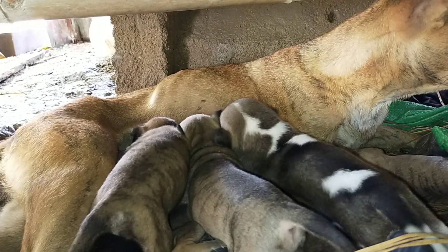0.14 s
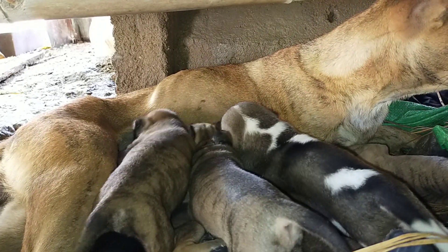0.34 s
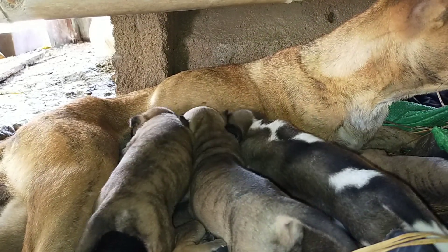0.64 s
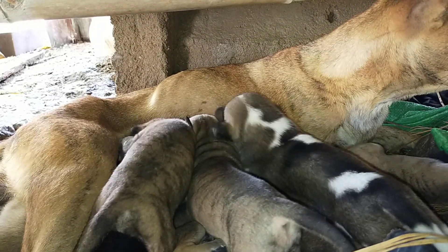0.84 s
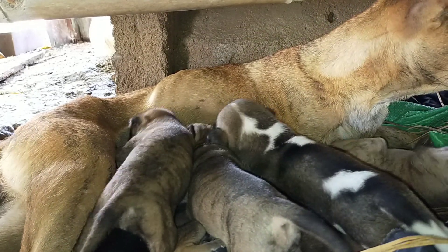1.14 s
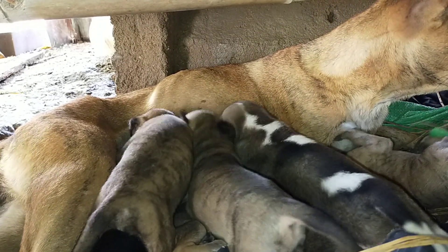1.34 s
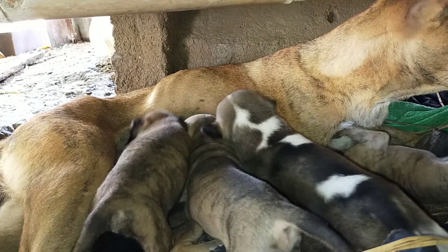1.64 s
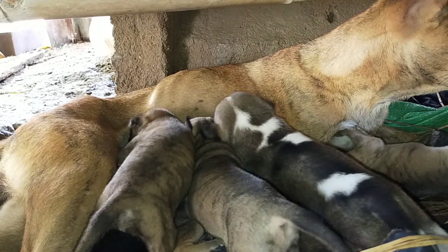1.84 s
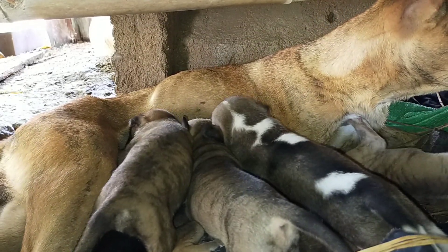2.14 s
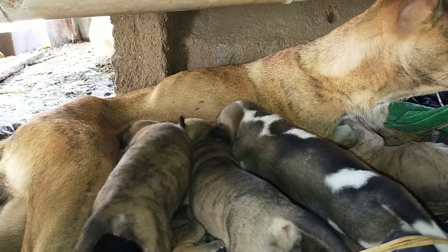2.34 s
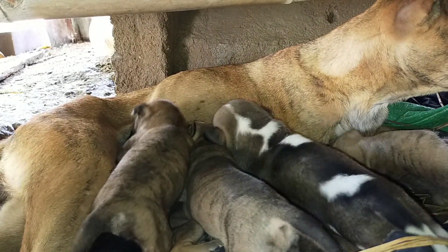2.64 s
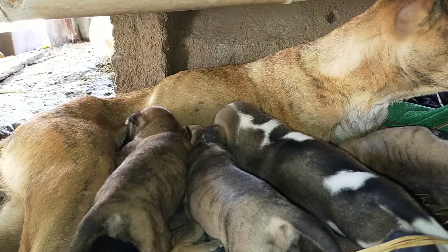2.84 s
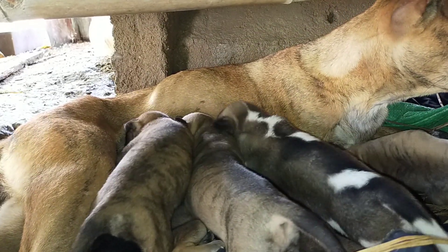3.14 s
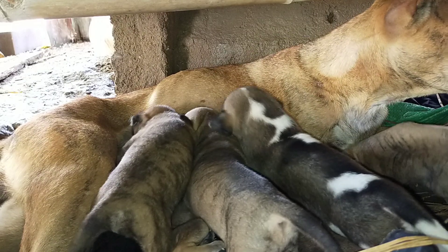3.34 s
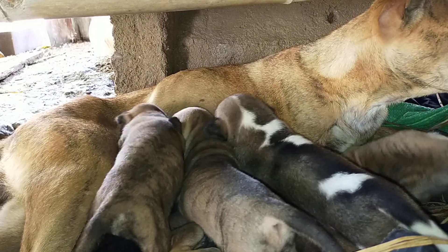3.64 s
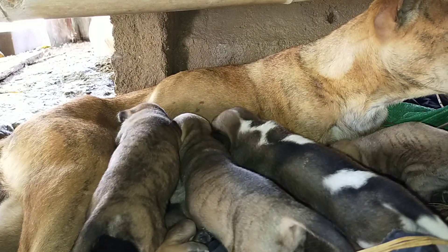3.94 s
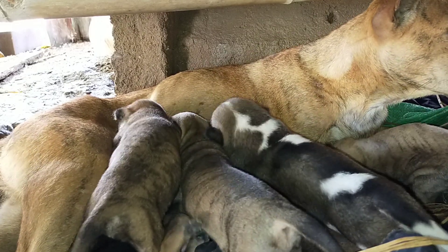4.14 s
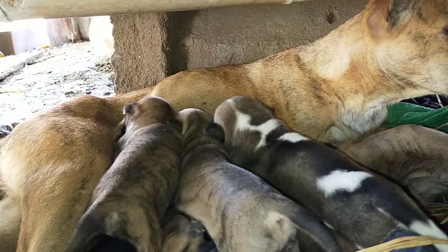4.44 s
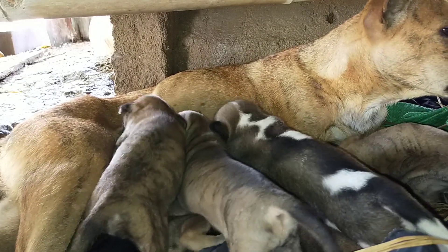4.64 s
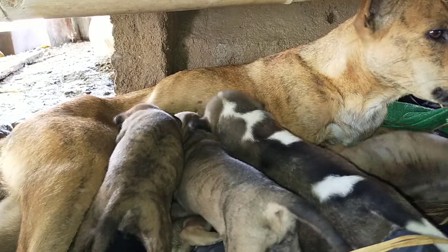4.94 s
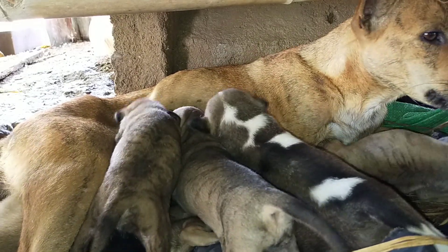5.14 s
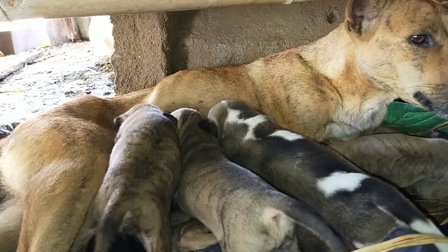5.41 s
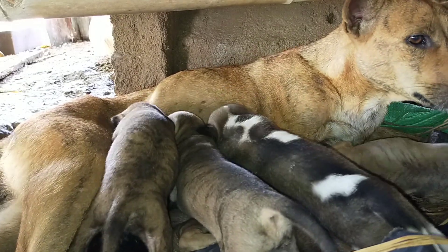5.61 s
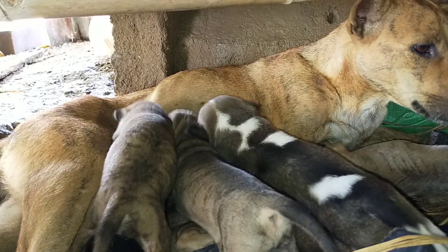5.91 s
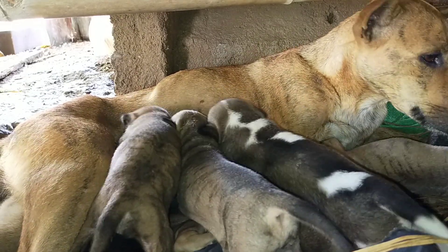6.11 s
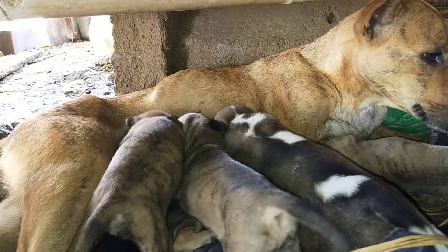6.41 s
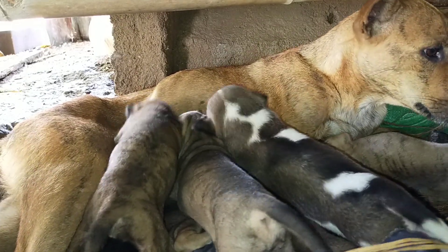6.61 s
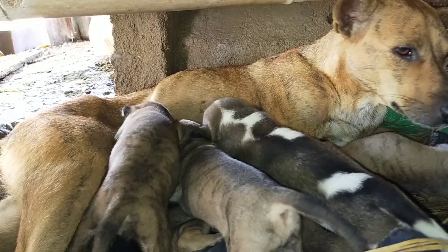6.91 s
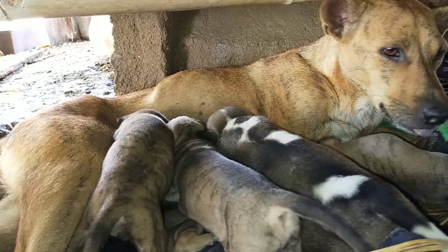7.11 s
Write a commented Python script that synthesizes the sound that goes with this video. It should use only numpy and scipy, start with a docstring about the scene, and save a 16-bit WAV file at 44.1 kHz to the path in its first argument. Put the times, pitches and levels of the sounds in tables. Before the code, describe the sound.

A close outdoor scene of nursing puppies, with only a faint short reflection from nearby surfaces. Throughout, a distant engine idles quietly under low rumble, swelling slightly around 1.5 s, and thin hiss. Tiny squeaks come at 0.2 s, then two light hard taps near 0.4 s. From 0.7 to 1.15 s thin wavering whines overlap, mostly falling in pitch. A steeply dropping whine follows at 1.5 s, then two more around 2.0-2.4 s, with a dry, bright tongue click at 2.18 s. Further whines sound at 2.8, 3.8, 4.45, 5.1 and 5.8 s, between short squeaks; a soft bump lands at 3.7 s and rough grunts at 4.1 s. Wet smacks, snuffles and fur rustling on dry bedding recur, smacks clustering near 5.9 s. Later calls turn low: a hoarse grunt at 6.3 s, a wobbling moan at 6.7-6.9 s, then snuffles and small grunts after 7 s.

```python
"""Thin, wavering whines of young puppies nursing outdoors overlap and mix with squeaks, hoarse grunts and a moan.
Voices are harmonic sums on drawn pitch curves, filtered by muzzle and throat; roughness shakes pitch and level.
Smacks, snuffles and rubbing fur are shaped noise; taps, bumps and a tongue click are decaying sines and noise.
Behind them a distant engine idles as wavering low harmonics, with a low rumble and a thin hiss: outdoor air
plus the recorder's own high whistle, which also colours the rubbing."""
import sys
import numpy as np
from scipy import signal
from scipy.fft import rfft, irfft, next_fast_len
from scipy.io import wavfile

SR = 44100
rng = np.random.default_rng(int(sys.argv[2]) if len(sys.argv) > 2 else 0)


def output_pcm(signal):
    """Save a mono or channel-first signal as 16-bit PCM at the path in sys.argv[1].

    Samples are clipped to [-1, 1] before scaling.
    """
    pcm = np.clip(np.atleast_2d(signal).T, -1, 1) * 32767
    wavfile.write(sys.argv[1], SR, np.round(pcm).astype(np.int16))


N = 320607
T = np.arange(N) / SR
TOP_HZ = 15750

# Engine harmonics: (multiple of firing rate [1], relative level [dB])
ENGINE_HARMONICS = [(3, -10.5), (4, -9), (5, -11), (6, -2), (7, -1.5), (8, -1.5), (9, -5.5), (10, -6),
                    (11, -7.5), (14, -35)]
IDLE_HZ = 11.63  # mean firing rate, one cylinder
# Rumble spectrum: (frequency [Hz], relative level [dB])
RUMBLE_SHAPE = [(15, -10), (25, -12), (36, 0), (48, 5), (70, 2), (105, -2.5), (140, -8.5), (200, -13),
                (300, -23.5), (500, -38.5)]
# The rumble's one swell: (time [s], half length [s], rise [dB])
RUMBLE_RISE = (1.52, 1.0, 4)
# Background hiss spectrum, outdoor air plus the recorder's own thin high tones:
# (frequency [Hz], relative level [dB])
HISS_SHAPE = [(150, -37), (250, -10.5), (405, -2.5), (995, -2.5), (1270, -6), (2570, -7), (5220, -20),
              (7770, -9.5), (9890, -21), (11600, -8), (15500, -8)]
RUMBLE_DB, HISS_DB = -57, -66  # before swell and flicker

# Shoves that rub fur on dry bedding: (time [s], half length [s], relative level [dB])
FUR_SHOVES = [(0.018, .04, -65), (0.54, 0.24, -64), (0.872, 0.092, -69), (1.2, 0.36, -64.5),
              (1.664, 0.27, -58.5), (2.16, 0.14, -56.5), (2.91, 0.11, -63.5), (3.513, 0.2, -61.5),
              (3.804, 0.067, -55), (4.216, 0.086, -61), (4.635, 0.1, -60.5), (4.922, 0.1, -58.5),
              (5.155, 0.13, -60), (5.442, 0.073, -56.5), (5.61, .1, -68), (5.977, 0.13, -63),
              (6.406, 0.094, -63), (6.625, 0.068, -59.5), (7.18, 0.17, -56.5)]
# Spectrum of rubbing fur, with the recorder's thin high whistle near 11.8 kHz:
# (frequency [Hz], relative level [dB])
RUB_AND_WHISTLE_SHAPE = [(300, -8), (1000, -10), (2600, -9), (4000, -13.5), (5800, -14), (7000, -13.5),
                         (7750, -5), (8600, -13), (9800, -15.5), (11800, -6), (12600, -8.5), (14200, 0.5),
                         (17000, 1)]
FIDGET_DB = -74  # rubbing between shoves, on the scale of the shoves

# Taps on something small and hard: (time [s], relative level [dB])
TAPS = [(0.36, -63.5), (0.458, -64)]
# Ringing modes of the tapped object: (frequency [Hz], relative level [dB], decay [s])
TAP_MODES = [(1157, 12, 0.0061), (2150, -4, 0.028), (3220, 7.5, 0.0074), (4430, -2.5, 0.02),
             (5680, 5.5, 0.0056)]
# Soft bumps in the bedding: (time [s], relative level [dB])
BEDDING_BUMPS = [(3.723, -45.5), (3.788, -49)]

CLICK_S = 2.1803  # tongue click
# Snuffles against the teat: (time [s], half length [s], relative level [dB])
NOSE_SNUFFLES = [(1.333, 0.051, -64), (2.618, 0.049, -68), (4.18, 0.053, -59.5), (5.694, 0.11, -64.5),
                 (7.001, 0.039, -60), (7.037, 0.025, -56), (7.103, 0.02, -54.5)]
# Nostril noise spectrum: (frequency [Hz], relative level [dB])
SNOUT_SHAPE = [(300, -11), (700, -3.5), (1100, -3.5), (1450, 1.5), (2000, -4), (2700, -9.5), (4000, -19),
               (8000, -23.5)]
# Wet smacks: (time [s], relative level [dB], brightness [dB]: more spittle, less cavity)
MOUTH_SMACKS = [(.553, -72, 10), (.926, -68, -1), (.957, -60, 2), (1.055, -64, 5), (1.261, -84, 14),
                (1.364, -55, 3), (1.794, -70.5, 13), (2.443, -63, -2.5), (2.52, -65.5, 4), (2.711, -60, -2),
                (3.723, -57.5, -7), (4.933, -74, -14), (5.612, -68.5, 9), (5.624, -62, -0.5),
                (5.659, -59, -2.5), (5.782, -62.5, 7.5), (5.863, -51, 0), (5.895, -54, 6),
                (5.915, -51.5, 3.5), (6.024, -60, -3.5), (6.537, -70.5, -10.5), (7.208, -58.5, 6)]
# Mouth cavity spectrum: (frequency [Hz], relative level [dB])
CAVITY_SHAPE = [(200, -0.5), (330, -5.5), (700, -0.5), (1200, -4.5), (1900, -10), (3000, -44)]
# Lip spectrum: (frequency [Hz], relative level [dB])
LIPS_SHAPE = [(1200, -21), (2000, 5.5), (3100, 1.5), (4000, -10), (5500, -8), (8000, -6)]
# Spittle spectrum: (frequency [Hz], relative level [dB])
SPITTLE_SHAPE = [(3500, -37), (6000, -13), (7700, 5), (9700, -13), (12000, -7.5), (14500, 11),
                 (16000, -15.5)]

# Long whines: (effort at start [dB], effort at end [dB], opening yelp [dB], high harmonics [dB],
# pitch curve of (time [s], pitch [Hz]))
LONG_WHINES = [ (-48.5, -40, 0.5, -7.5, [(0.735, 1088), (0.78, 1043), (0.805, 1084), (0.835, 969),
               (0.858, 980)]), (-37, -39.5, -4, -11, [(0.722, 1459), (0.752, 1342), (0.79, 1406),
               (0.833, 1169), (0.872, 1257), (0.925, 917), (0.96, 976), (0.99, 900)]),
               (-36, -43, -1, -11.5, [(0.862, 903), (0.88, 817), (0.92, 898), (0.955, 957), (1.0, 866),
               (1.05, 918), (1.095, 920), (1.115, 830)]), (-38.5, -41, 0.5, -9.5, [(1.451, 1223),
               (1.463, 1105), (1.481, 1066), (1.511, 904.9), (1.551, 697), (1.591, 782.3), (1.633, 588),
               (1.66, 679)]), (-41.5, -43.5, 0, -22.5, [(1.965, 1144), (2.015, 1242), (2.053, 1149),
               (2.097, 1286), (2.129, 1220), (2.15, 1180)]), (-37, -40, 0, -10.5, [(2.151, 930),
               (2.169, 922), (2.183, 968), (2.215, 958), (2.261, 874), (2.307, 915), (2.357, 909),
               (2.378, 865)]), (-38.5, -41.5, 1.5, -11, [(2.798, 972), (2.814, 943), (2.848, 1078),
               (2.866, 1057), (2.894, 840), (2.906, 831), (2.954, 942), (2.968, 931), (3.02, 844)]),
               (-41.5, -40, 10.5, -11, [(3.815, 1024), (3.821, 1015), (3.861, 1107), (3.917, 955),
               (3.983, 945.5), (3.995, 955), (4.041, 1205), (4.05, 1216)]),
               (-35, -37.5, -3.5, -12.5, [(4.446, 1060), (4.494, 984), (4.524, 1027), (4.552, 978),
               (4.586, 1026), (4.598, 1022), (4.636, 1092), (4.674, 1028), (4.704, 1091), (4.758, 1029),
               (4.798, 1098), (4.825, 988)]), (-37, -39, 6.5, -11.5, [(5.09, 969), (5.115, 1047),
               (5.16, 894), (5.19, 785), (5.23, 719), (5.26, 761), (5.29, 721), (5.33, 883), (5.385, 917),
               (5.43, 852), (5.466, 862)]), (-38.5, -43.5, -1.5, -15.5, [(5.77, 965), (5.784, 882),
               (5.816, 904), (5.852, 774), (5.89, 785), (5.93, 675), (5.954, 664), (5.99, 823),
               (6.01, 760)]), ]
# Short squeaks, one pitch arc each:
# (time [s], length [s], first pitch [Hz], middle pitch [Hz], last pitch [Hz], effort [dB])
SHORT_SQUEAKS = [(0.195, 0.027, 1258, 1288, 1133, -37), (0.225, 0.015, 993, 937, 895, -42.5),
                 (.69, 0.038, 1230, 1230, 1228, -53.5), (.708, 0.013, 1530, 1460, 1440, -47),
                 (1.0, 0.09, 1190, 1234, 1230, -58), (1.105, 0.023, 1283, 1290, 1180, -41),
                 (1.135, 0.017, 1060, 980, 834, -46), (1.152, .043, 1156, 1127, 1050, -60.5),
                 (2.493, 0.013, 1120, 1103, 1060, -56), (2.695, .1, 1192, 1265, 1250, -40.5),
                 (3.263, 0.0088, 920, 936, 960, -50), (3.301, 0.039, 1117, 1154, 1104, -59.5),
                 (3.348, 0.081, 1154, 1236, 1082, -41.5), (3.433, .082, 795, 838, 752, -40),
                 (3.792, 0.024, 1220, 1348, 1424, -36), (4.047, 0.059, 1244, 1186, 1067, -42),
                 (4.043, 0.057, 1026, 864, 770, -41.5), (4.391, 0.056, 1220, 1301, 1322, -41.5),
                 (5.078, 0.011, 1290, 1345, 1400, -35.5), (5.464, 0.042, 713, 742, 798, -45),
                 (6.216, 0.06, 755, 656, 750, -47.5)]
# Low grunts, one pitch arc each: (time [s], length [s], first pitch [Hz], middle pitch [Hz],
# last pitch [Hz], effort [dB], octave [dB], roughness [0-1])
LOW_GRUNTS = [(4.11, 0.043, 636, 537, 375, -39, -12.5, 0.6),
              (4.151, 0.025, 512, 618, 510, -37.5, -21, 0.37),
              (4.182, 0.016, 470, 450, 515, -34, -27, 0.23),
              (4.811, 0.025, 414, 385, 383, -43.5, -12, 0.06),
              (5.655, 0.082, 379, 270, 266, -53.5, -0.5, 0.25),
              (6.321, 0.0695, 495.5, 439, 440, -46, -5, 0.74), (7.14, 0.061, 376, 326, 305, -48, 1, 0.32),
              (7.239, 0.029, 478, 446, 430, -46, -4, .18)]
# Pitch of one long hoarse moan: (time [s], pitch [Hz])
MOAN_PITCH = [(6.665, 450), (6.7, 397), (6.735, 523.5), (6.8, 434), (6.835, 465), (6.885, 535),
              (6.912, 466)]
MOAN_EFFORT_DB = -44.5
# Moments when voices crack: (time [s], half length [s], added roughness [0-1])
VOICE_CRACKS = [(0.223, 0.0075, 0.3), (1.651, 0.011, 0.44), (2.772, 0.01, 0.5), (3.01, 0.0086, 0.4),
                (3.368, 0.0062, 0.47), (3.508, 0.011, 0.48), (3.8, 0.016, 0.16), (4.063, 0.0084, 0.7),
                (5.121, 0.0067, 0.5), (5.416, 0.0096, 0.43), (5.481, 0.023, 0.5), (6.67, 0.0087, 0.61),
                (6.89, 0.0089, 0.3)]
# Throat and nose, third harmonic and up: (frequency [Hz], gain [dB])
THROAT_SHAPE = [(1200, -18), (2250, -7), (2750, -29), (3300, -33), (5400, -40), (6500, -22), (7300, -31),
                (8200, -27), (9500, -36.5), (11200, -20.5), (12500, -26), (14200, -16.5), (17000, -30)]
# Fixed resonances and notches of muzzle and nest, two lowest harmonics: (frequency [Hz], gain [dB])
MUZZLE_SHAPE = [(300, -13), (600, -12), (705, -6.5), (810, -14), (900, -2.5), (1090, 0), (1160, -6),
                (1260, -8), (1400, -3), (1590, -15), (1660, -12), (1720, -18), (1810, -9.5), (1900, -11),
                (2000, -24), (2090, -12), (2190, -5.5), (2300, -9.5), (2480, -8.5), (2800, -18)]
YELP_AFTER_S, YELP_HALF_S = 0.034, 0.063  # from the first pitch point


def undb(db):
    """Decibels to gain."""
    return 10 ** (np.asarray(db) / 20)


def gain_at(hz, shape):
    """Gain of a (Hz, dB) shape, interpolated over log frequency."""
    shape_hz, shape_db = np.transpose(shape)
    return undb(np.interp(np.log(np.maximum(hz, 1)), np.log(shape_hz), shape_db))


def colour(x, shape):
    """Filter by a (Hz, dB) shape that falls away beyond its ends; rms 1."""
    hz = np.arange(len(x) // 2 + 1) * SR / len(x)
    low_end = np.minimum(hz / shape[0][0], 1) ** 2
    high_end = np.maximum(hz / shape[-1][0], 1) ** 2
    y = irfft(rfft(x) * gain_at(hz, shape) * low_end / high_end, len(x))
    return y / y.std()


def noise(shape, size=N):
    """Coloured noise of rms near 1."""
    return colour(rng.standard_normal(next_fast_len(size)), shape)[:size]


def walk(rate_hz, size=N):
    """Random values joined by straight lines, rate_hz new ones a second; spread near 1."""
    knots = 1.22 * rng.standard_normal(size // 16 + 2)
    return np.interp(np.arange(size) * (rate_hz / SR), np.arange(len(knots)), knots)


def glide(t, s, values):
    """Join points smoothly: the motion comes to rest at each turning point."""
    slope = np.diff(values) / np.diff(s)
    before, after = slope[:-1], slope[1:]
    through = 2 * np.maximum(before * after, 0) / (before + after + 1e-9)
    speed = np.r_[slope[0], through, slope[-1]]
    i = np.clip(np.searchsorted(s, t) - 1, 0, len(slope) - 1)
    span = np.diff(s)[i]
    u = np.clip((t - s[i]) / span, 0, 1)
    bend = (speed[i] - slope[i]) * (1 - u) - (speed[i + 1] - slope[i]) * u
    return values[i] + span * u * (slope[i] + (1 - u) * bend)


def swell(t, at_s, half_s):
    """Bell-shaped rise and fall, 1/e at half_s from its peak."""
    return np.exp(-((t - at_s) / half_s) ** 2)


def add(out, start_s, sound):
    """Mix a sound in at start_s."""
    i = int(start_s * SR)
    out[i:i + len(sound)] += sound[:N - i]


def engine(level_db=-56, waver_db=2):
    """Far away only low multiples of the firing rate are left, each wavering in the moving air."""
    turns = np.cumsum(IDLE_HZ * (1 + 0.0047 * walk(1.56))) / SR
    thud = np.zeros(N)
    for k, db in ENGINE_HARMONICS:
        thud += undb(db + waver_db * walk(3.9)) * np.sin(2 * np.pi * (k * turns + rng.random()))
    return undb(level_db) * thud / thud.std()


def background():
    """Engine plus two flickering noises: low rumble with one swell, thin hiss of air and recorder."""
    at_s, half_s, rise_db = RUMBLE_RISE
    rumble_db = RUMBLE_DB + rise_db * swell(T, at_s, half_s) + 1.8 * walk(25)
    rumble = noise(RUMBLE_SHAPE) * undb(rumble_db)
    hiss = noise(HISS_SHAPE) * undb(HISS_DB + 0.5 * walk(5.4))
    return engine() + rumble + hiss


def bedding(grain_db=3.0, flicker_db=2.0, rub_db=3.0, ticks_per_s=14, tick_db=6):
    """Countless hairs slip over dry stalks in small uneven strokes; now and then a stalk ticks."""
    size = next_fast_len(N)
    grain_levels_db = grain_db * np.minimum(rng.exponential(size=size), 6)
    grains = rng.standard_normal(size) * undb(grain_levels_db)
    rustle = colour(grains, RUB_AND_WHISTLE_SHAPE)[:N]
    snaps = (rng.random(N) < ticks_per_s / SR).astype(float)
    fading = signal.lfilter([1], [1, -np.exp(-1 / (0.002 * SR))], snaps)  # 2 ms decay
    ticks = fading * (noise(SPITTLE_SHAPE) + 0.47 * noise(LIPS_SHAPE))
    shoves = sum(undb(db) * swell(T, at_s, half_s) for at_s, half_s, db in FUR_SHOVES)
    rubbing = np.hypot(undb(FIDGET_DB), shoves)
    strokes_db = 20 * np.log10(rubbing) + flicker_db * walk(45) + 1.3 * walk(300)
    return (rustle + undb(tick_db) * ticks) * undb(strokes_db + rub_db)


def nudges(bump_hz=335):
    """Shifting bodies tap a small hard object, ringing its modes, and bump the bedding."""
    out = np.zeros(N)
    t = np.arange(SR // 4) / SR
    ring = sum(undb(db) * np.sin(2 * np.pi * hz * t) * np.exp(-t / decay_s)
               for hz, db, decay_s in TAP_MODES)
    for at_s, db in TAPS:
        knock = (noise(LIPS_SHAPE, len(t)) + noise(CAVITY_SHAPE, len(t))) * np.exp(-t / 0.0055)
        add(out, at_s, undb(db) * (ring + 2.0 * knock))
    for at_s, db in BEDDING_BUMPS:
        bump = np.sin(2 * np.pi * bump_hz * t) + 0.5 * noise(CAVITY_SHAPE, len(t))
        add(out, at_s, undb(db) * bump * np.exp(-t / 0.024))
    return out


def tongue(ring_hz=7500, click_db=-24):
    """Suction breaks with one high, dry click: a decaying sine and a band of noise."""
    out = np.zeros(N)
    t = np.arange(SR // 16) / SR
    band = [(ring_hz * 0.65, -22), (ring_hz * 0.92, 0), (ring_hz * 1.08, 0), (ring_hz * 1.35, -26)]
    ping = 1.7 * np.sin(2 * np.pi * ring_hz * t) * np.exp(-t / 0.0007)
    hiss = 0.2 * noise(band, len(t)) * np.exp(-t / 0.003)
    onset = 1 - np.exp(-t / 0.0002)
    add(out, CLICK_S, undb(click_db) * (ping + hiss) * onset)
    return out


def snuffles():
    """Air flutters through small wet nostrils."""
    flow = sum(undb(db) * swell(T, at_s, half_s) for at_s, half_s, db in NOSE_SNUFFLES)
    return flow * noise(SNOUT_SHAPE) * undb(3.7 * walk(110) - 0.5)


def mouths(decay_s=0.0072, rise_s=0.00034, crackle_db=3):
    """Smacks ring the mouth cavity, the lips and the spittle."""
    out = np.zeros(N)
    t = np.arange(SR // 16) / SR
    envelope = np.exp(-t / decay_s) * (1 - np.exp(-t / rise_s))
    for at_s, db, bright_db in MOUTH_SMACKS:
        cavity = undb(db - bright_db + 7) * noise(CAVITY_SHAPE, len(t))
        lips = undb(db + 3.5) * noise(LIPS_SHAPE, len(t))
        spittle = undb(db + bright_db + 3.5) * noise(SPITTLE_SHAPE, len(t))
        # wet skin parts in several tiny steps
        crackle = undb(crackle_db * walk(620, len(t)))
        add(out, at_s, (cavity + lips + spittle) * envelope * crackle)
    return out


def arc(start_s, length_s, pitches_hz):
    """Pitch curve of a short call through its first, middle and last pitch."""
    return list(zip((start_s, start_s + length_s / 2, start_s + length_s), pitches_hz))


def cry(contour, efforts_db, yelp_db, octave_db, rough, jitter, upper_db, edge_s, release_s, flutter_db):
    """One call of the vocal folds: fundamental, octave and upper harmonics shaped by muzzle and throat."""
    s, hz = np.transpose(sorted(contour))
    t = np.arange(int((s[0] - edge_s) * SR), int((s[-1] + edge_s) * SR)) / SR
    n = len(t)
    rough = rough + sum(amount * swell(t, at_s, half_s) for at_s, half_s, amount in VOICE_CRACKS)
    note_hz = glide(t, s, hz)
    # irregular folds shake both the period and the strength of the cycles
    pitch_hz = note_hz * (1 + jitter * walk(164.0, n) + 0.15 * rough * walk(900, n))
    phase = 2 * np.pi * np.cumsum(pitch_hz) / SR
    ramps = np.minimum((t - t[0]) / (1.56 * edge_s), (t[-1] - t) / release_s)
    gate = np.sin(np.pi / 2 * np.clip(ramps, 0, 1)) ** 2
    # steady drift, with a yelp (or a dip, if negative) near the start
    effort_db = np.linspace(*efforts_db, n) + yelp_db * swell(t, s[0] + YELP_AFTER_S, YELP_HALF_S)
    size = undb(effort_db + 0.5 * walk(63.4, n)) * gate * (1 + 0.78 * rough * walk(800, n))
    fundamental = gain_at(note_hz, MUZZLE_SHAPE) * np.sin(phase)
    octave = undb(octave_db) * gain_at(2 * note_hz, MUZZLE_SHAPE) * np.sin(2 * phase)
    tone = fundamental + octave
    # a louder call is purer, tighter folds are brighter
    edge_db = upper_db - 0.38 * (effort_db + 40) + 6 * np.log2(pitch_hz / 950)
    for k in range(3, 20):
        gain = gain_at(k * pitch_hz, THROAT_SHAPE) * (k * pitch_hz < TOP_HZ)
        tone += gain * undb(edge_db + flutter_db * walk(22.9, n)) * np.sin(k * phase)
    return t[0], np.sqrt(2) * size * tone


def hoarse(contour, effort_db, octave_db, rough):
    """A low call: slack folds leak air in step with the voice."""
    start_s, voice = cry(contour, (effort_db, effort_db), yelp_db=0.5, octave_db=octave_db, rough=rough,
                         jitter=0.0138, upper_db=-20.5, edge_s=0.006, release_s=0.01, flutter_db=3.5)
    breath = undb(-19) * np.abs(voice) * noise(SNOUT_SHAPE, len(voice))
    return start_s, voice + breath


def puppies():
    """Clean high whines and squeaks from steady folds, low grunts and a moan from rough ones."""
    out = np.zeros(N)
    for first_db, last_db, yelp_db, upper_db, contour in LONG_WHINES:
        add(out, *cry(contour, (first_db, last_db), yelp_db, octave_db=-6, rough=0.0064, jitter=0.00303,
                      upper_db=upper_db, edge_s=0.0024, release_s=0.011, flutter_db=4.5))
    for at_s, length_s, *pitches_hz, db in SHORT_SQUEAKS:
        add(out, *cry(arc(at_s, length_s, pitches_hz), (db, db), yelp_db=-0.5, octave_db=-8.5, rough=0.016,
                      jitter=0.0021, upper_db=-20.5, edge_s=0.005, release_s=0.0096, flutter_db=8.5))
    for at_s, length_s, *pitches_hz, db, octave_db, rough in LOW_GRUNTS:
        add(out, *hoarse(arc(at_s, length_s, pitches_hz), db, octave_db, rough))
    add(out, *hoarse(MOAN_PITCH, MOAN_EFFORT_DB, octave_db=-7.0, rough=0.22))
    return out


def shelter(x, wet_db, decay_s):
    """The wall and ground close by give a faint, short scatter."""
    t = np.arange(SR // 5) / SR
    echo = rng.standard_normal(len(t)) * np.exp(-t / decay_s) * (t > 0.004)
    return x + undb(wet_db) * signal.fftconvolve(x, echo / np.linalg.norm(echo))[:N]


def scene():
    """The litter in its shelter, with click and bedding dry, over the background."""
    litter = shelter(puppies() + mouths() + snuffles() + nudges(), wet_db=-20.5, decay_s=0.02)
    return (litter + tongue() + bedding() + background())[None]


def record(dry):
    """The recorder cuts steeply above TOP_HZ."""
    return signal.sosfilt(signal.ellip(10, 0.2, 70, TOP_HZ, fs=SR, output="sos"), dry)


dry = scene()
out = record(dry)
output_pcm(out)
```